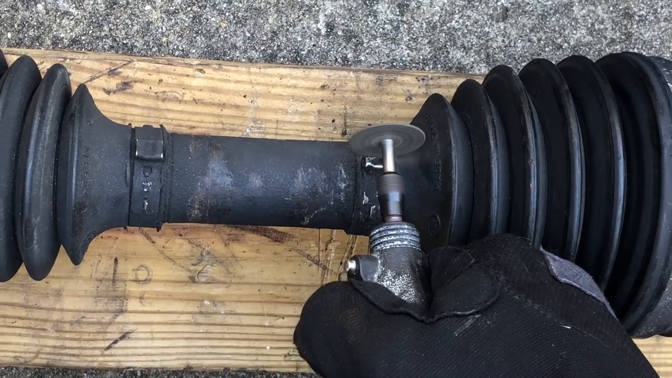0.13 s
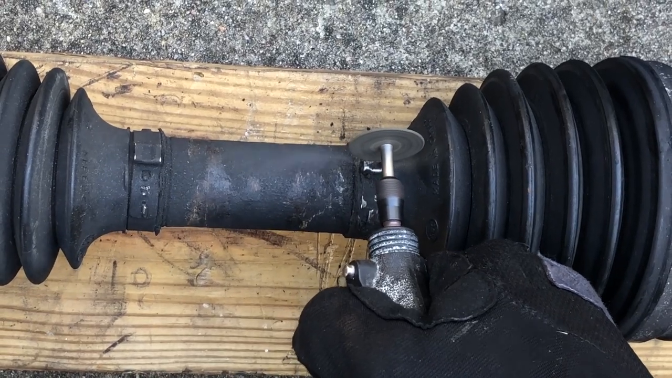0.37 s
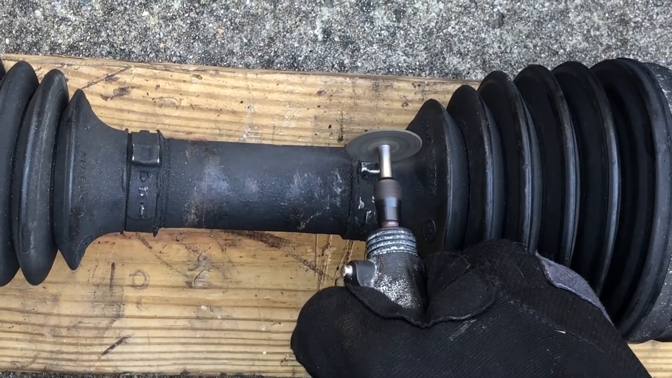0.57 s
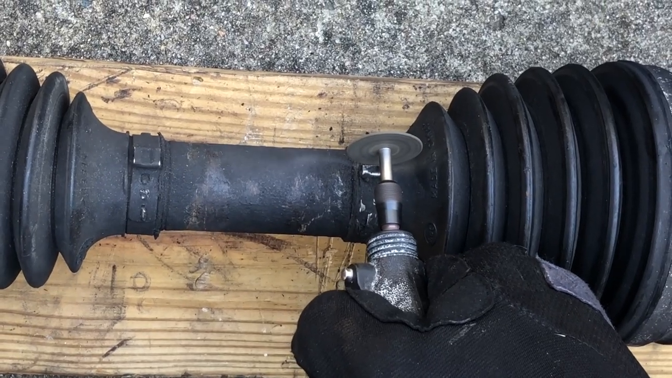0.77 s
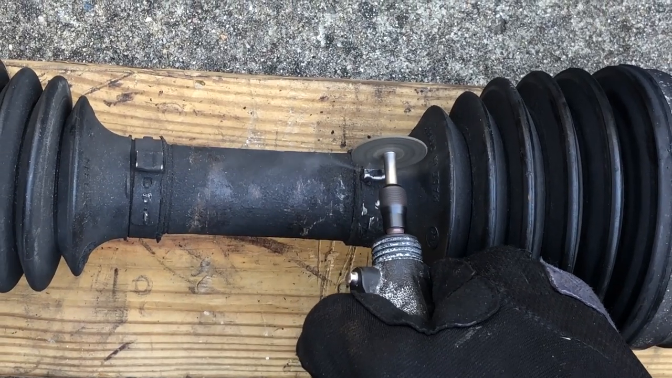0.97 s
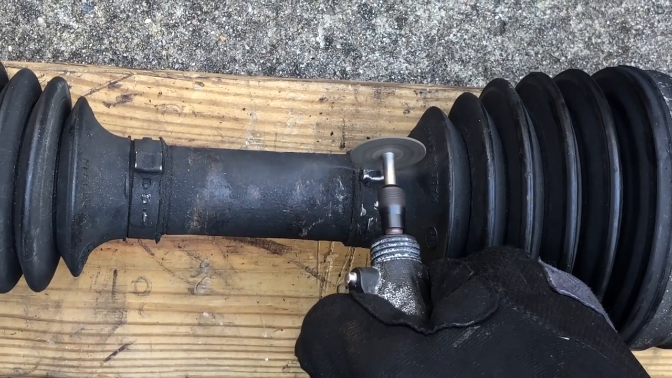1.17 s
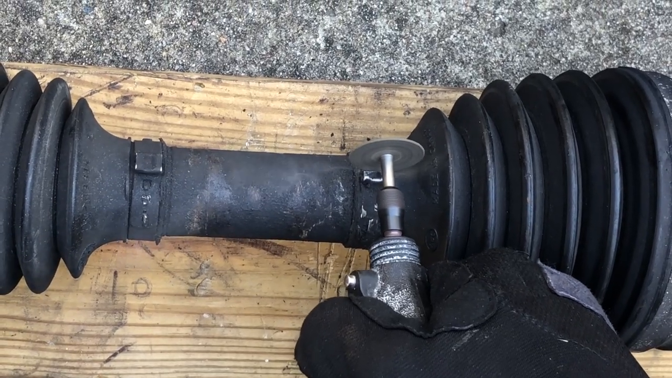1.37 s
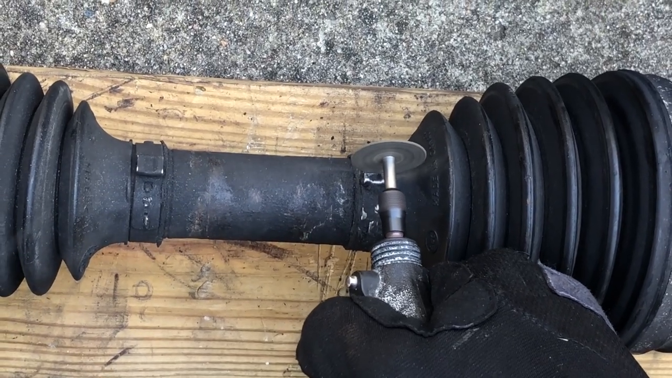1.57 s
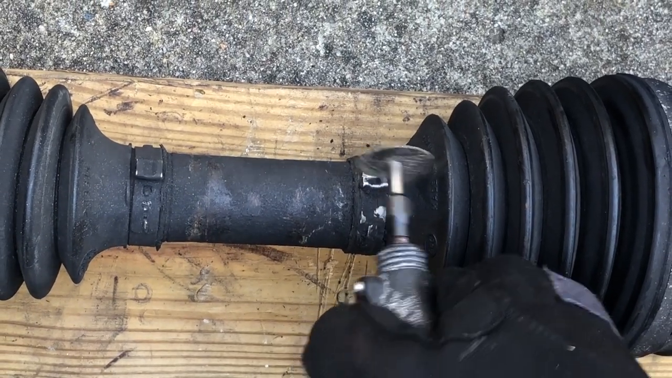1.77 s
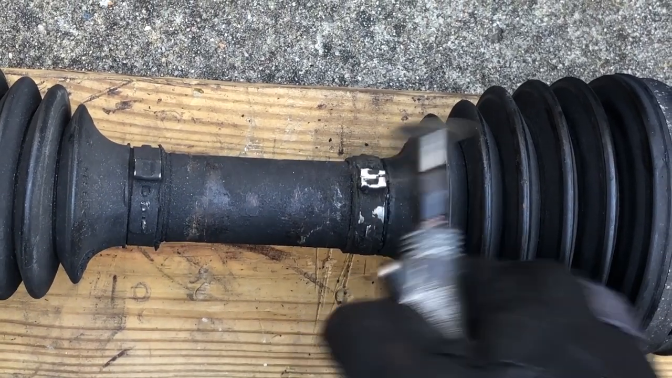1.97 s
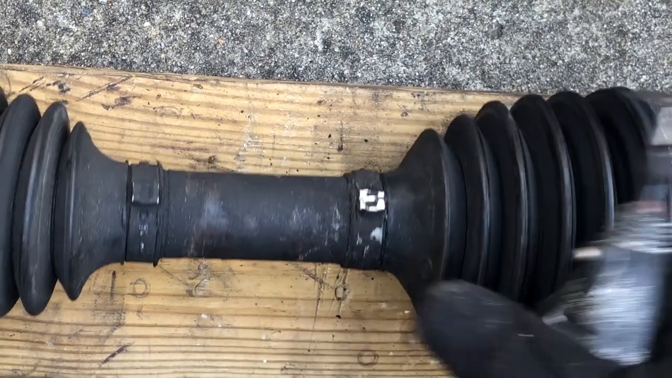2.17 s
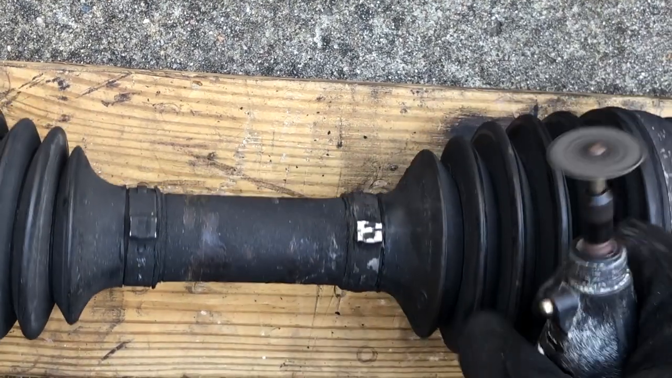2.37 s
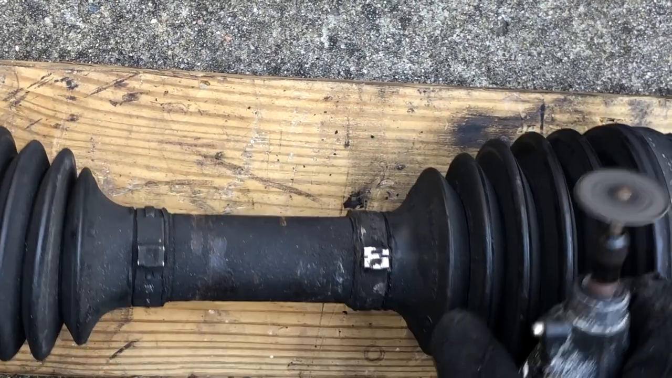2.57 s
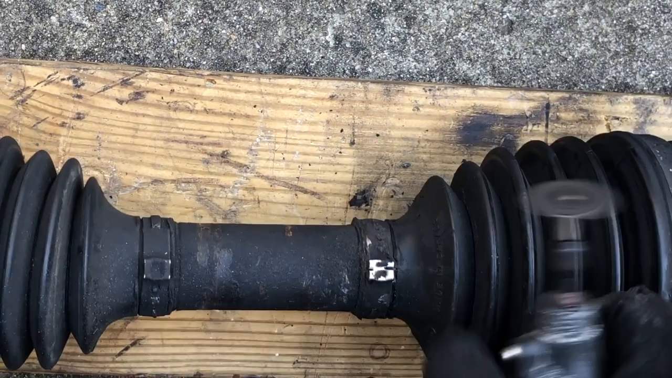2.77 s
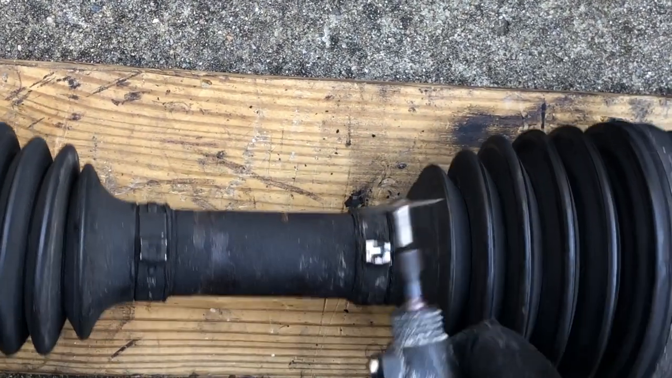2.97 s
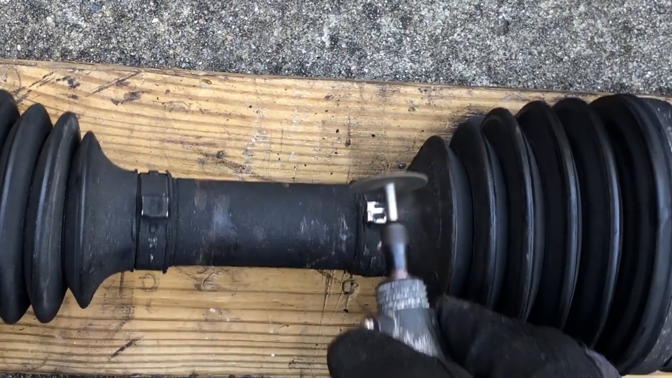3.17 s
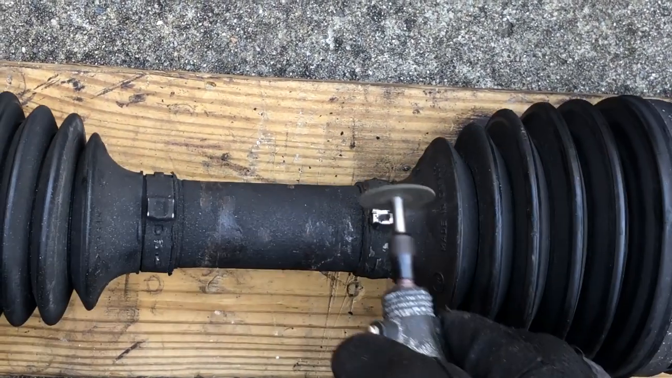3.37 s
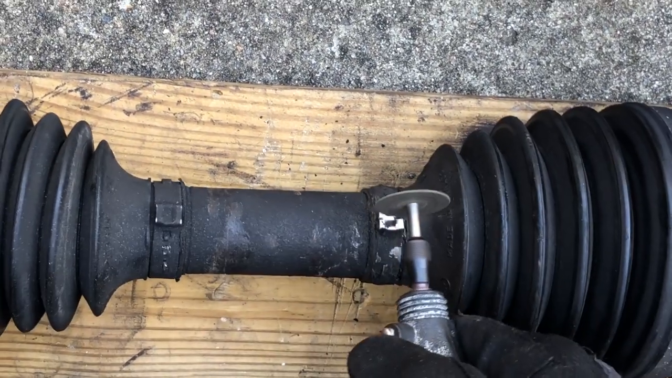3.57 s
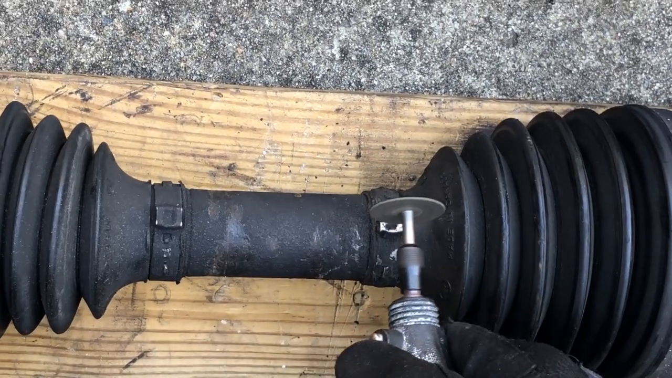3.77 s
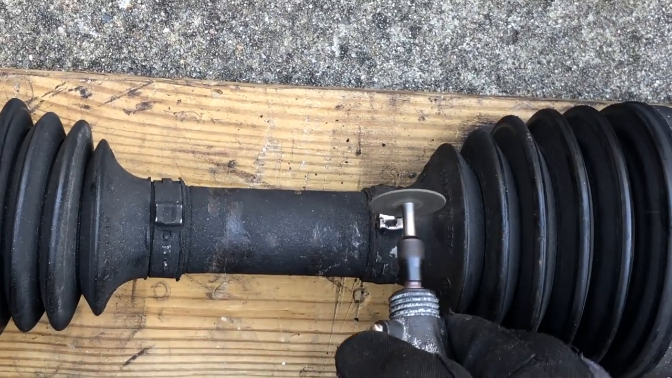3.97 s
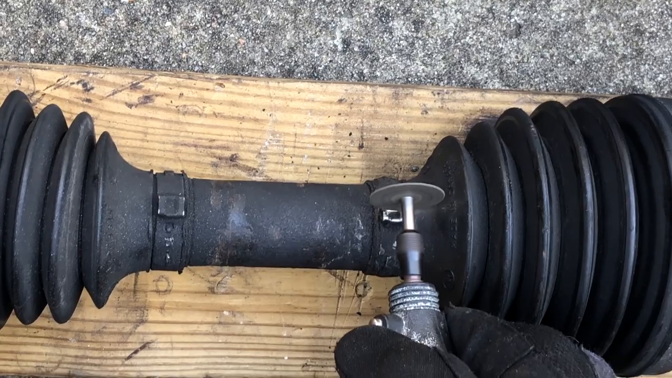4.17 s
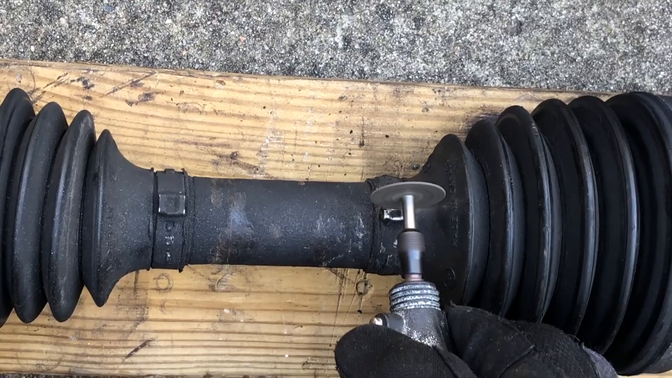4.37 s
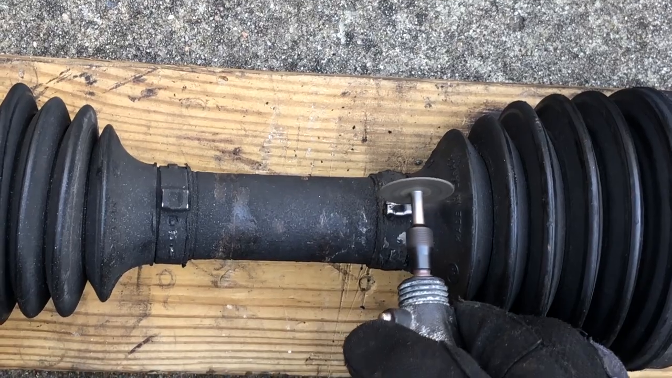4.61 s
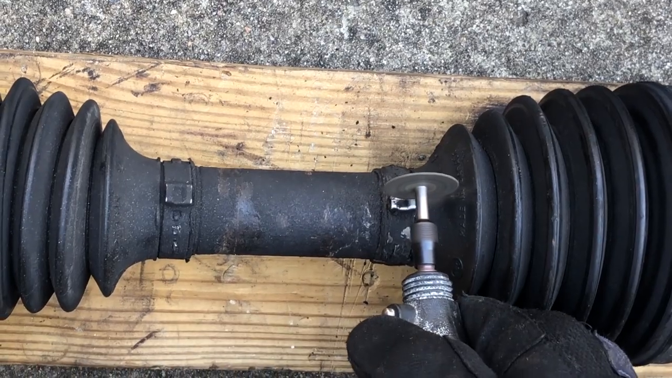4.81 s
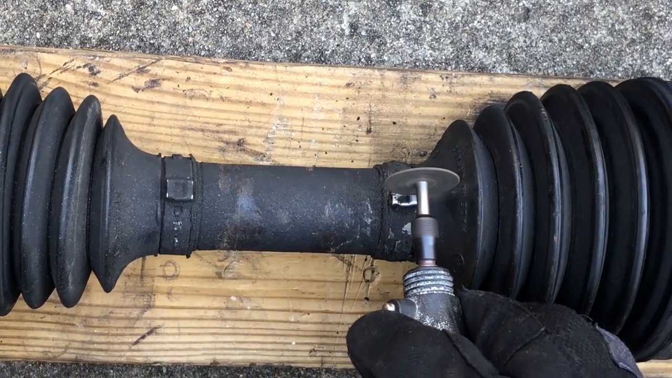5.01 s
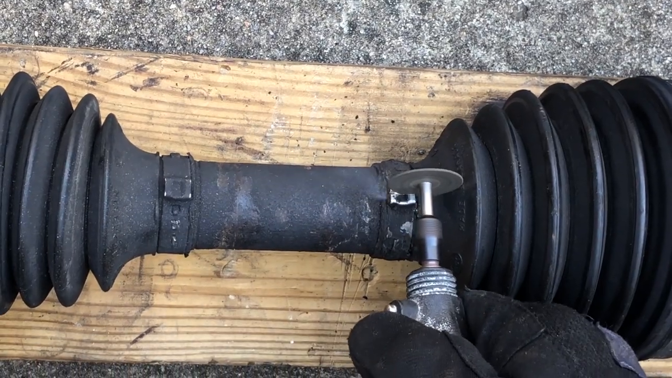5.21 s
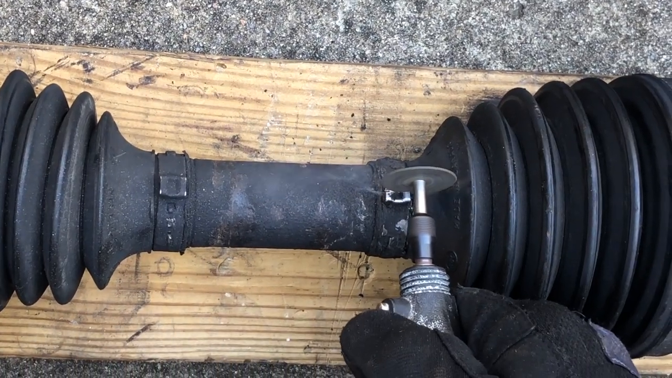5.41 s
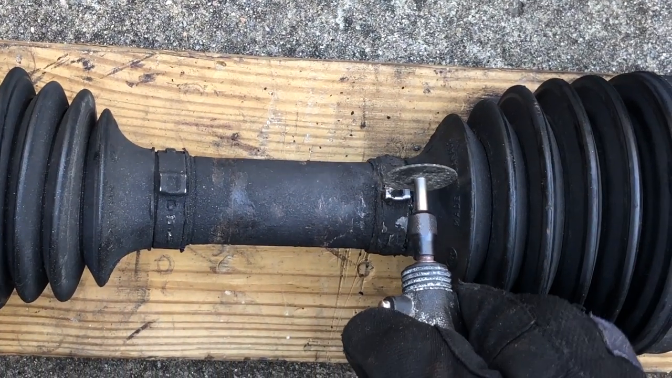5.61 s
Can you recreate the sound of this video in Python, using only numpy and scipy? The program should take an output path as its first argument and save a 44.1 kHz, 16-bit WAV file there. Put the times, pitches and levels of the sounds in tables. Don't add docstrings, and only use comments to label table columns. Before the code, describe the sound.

Gritty metal grinding sags to a growling stall, a small motor spins up with a buzzing whine, and raspy cutting resumes and slows.

```python
import sys
import numpy as np
from scipy import signal
from scipy.io import wavfile
from scipy.ndimage import uniform_filter1d

SR = 44100
rng = np.random.default_rng(int(sys.argv[2]) if len(sys.argv) > 2 else 0)


def linear_from_db(decibels):
    return 10 ** (np.asarray(decibels, float) / 20)


def unload_wav(signal):
    wavfile.write(
        sys.argv[1],
        SR,
        np.round(np.clip(np.atleast_2d(signal).T, -1, 1) * 32767).astype(np.int16),
    )


N = 249160
FULL_HZ = 362


def evened(x):
    return x / np.sqrt(np.mean(x ** 2) + 1e-20)


def smooth_noise(count, length):
    return evened(uniform_filter1d(rng.standard_normal(count), length))


def read(points, hz):
    f, value = np.transpose(points)
    return np.interp(np.log(hz + 1), np.log(f + 1), value)


def columns(rows, t):
    s, *rest = np.transpose(rows)
    return [np.interp(t, s, c) for c in rest]


def coloured(x, gain):
    log_gain = np.log(gain(abs(np.fft.fftfreq(8192, 1 / SR))) + 1e-5)
    spectrum = np.exp(np.conj(signal.hilbert(log_gain)))
    taps = np.fft.ifft(spectrum).real[:4096]
    return signal.oaconvolve(x, taps)[:len(x)]


def above(x, hz):
    sos = signal.butter(4, hz, "high", fs=SR, output="sos")
    return signal.sosfiltfilt(sos, x, padlen=0)


def patchy(x, patchy_db, flicker_db, frames=5, bins=5):
    z = signal.stft(x, nperseg=512, noverlap=384)[2]
    patches = rng.standard_normal(z.shape[::-1]).T
    patches = uniform_filter1d(patches, int(bins), 0)
    patches = evened(uniform_filter1d(patches, int(frames), 1))
    flicker = smooth_noise(z.shape[1], 5)
    z = z * linear_from_db(patchy_db * patches + flicker_db * flicker)
    return signal.istft(z, nperseg=512, noverlap=384)[1][:len(x)]


def resonate(x, hz, width):
    turn = np.exp(2j * np.pi * np.cumsum(hz) / SR)
    r = np.exp(-np.pi * width / SR)
    return 2 * (turn * signal.lfilter([1 - r], [1, -r], x / turn)).real


# t/s, speed/(turns per s)
BOGGING = [(0, 198), (.1, 188), (.368, 158), (.6, 144), (.81, 120.4), (1.08, 96.5), (1.3, 84), (1.78, 39),
           (1.8, 6.1)]
# t/s, speed/(turns per s)
BITING = [(4.26, 358), (4.386, 351.7), (4.514, 344.8), (4.678, 315.7), (5.034, 219.2), (5.132, 188.8),
          (5.272, 124.9), (5.4, 94.15), (5.65, 49.78)]
# t/s, speed/(turns per s), time constant/s
SPIN_UP = [(2.47, 70.6, .552), (2.11, 27, .11)]


def shaft(t):
    missing = sum(hz * np.exp((s - t) / tau) for s, hz, tau in SPIN_UP)
    free = np.maximum(FULL_HZ - missing, 5)
    rocking = np.cos(2 * np.pi * (t - .775) / .088) * np.exp(-((t - .82) / .36) ** 4)
    cutting = columns(BOGGING + BITING, t)[0] + 3.2 * rocking
    return np.where((t > BOGGING[-1][0]) & (t < BITING[0][0]), free, cutting)


# t/s, jolt level/dB, fade/s
CATCHES = [(.025, 5, .04), (.12, 0.5, .03), (.2763, 4, 0.039), (0.3585, 4, 0.049), (.598, 4, .035),
           (.772, 5, .04), (0.8494, 0.5, 0.04), (0.9553, 3, .026), (1.105, 0, 0.034), (1.2017, -2.5, .026),
           (1.5364, 2, .03), (1.7054, -1, 0.029), (1.738, 3, .03), (4.2476, 5, 0.03), (4.3137, 5, .03),
           (4.345, 2.5, 0.019), (4.401, 7, .02), (4.4471, 5, 0.024), (4.49, 5.5, .07), (4.594, 8, .03),
           (4.675, 1.5, 0.031), (4.7383, 3.5, 0.025), (4.7748, 2, 0.035), (4.8732, 6.5, 0.025),
           (5.1196, 4.5, 0.037), (5.206, 4.5, .035), (5.3493, 3, 0.025), (5.5557, 1, 0.028)]
# t/s, level/dB, half length/s
LIFTS = [(.09, -3.5, .025), (.206, -6.5, .025), (0.761, -1.5, .02), (0.9, -0.5, 0.018), (1.506, -7, .028),
         (1.598, 1, .02), (4.289, -2, 0.011), (4.47, -2, .012), (4.643, -5.5, 0.013), (5.176, -0.5, 0.021),
         (5.272, -2, .02), (5.526, -2, .025)]


def chatter(t, rise_s=.003):
    since = [(np.maximum(t - s + rise_s, 0), db, fade) for s, db, fade in CATCHES]
    jolts = sum(db * (1 - np.exp(-u / rise_s)) * np.exp(-u / fade) for u, db, fade in since)
    return jolts + sum(db * np.exp(-((t - s) / half) ** 2) for s, db, half in LIFTS)


def grit(t, hz, turns, memory, tearing, wobble):
    grains = 300
    turns = turns + .004 * smooth_noise(len(t), 900)
    count = int(turns[-1] - turns[0]) + 2
    angle = np.sort(rng.random(grains))
    keep = np.clip(memory, 0, .995)
    fresh_sizes = rng.standard_normal((count + 60, grains))
    size = signal.lfilter([np.sqrt(1 - keep ** 2)], [1, -keep], fresh_sizes, axis=0)[60:]
    strike_turns = np.floor(turns[0]) + np.arange(count)[:, None] + angle
    at = np.interp(strike_turns, turns, np.arange(len(t)), -99, -99).ravel()
    size, at = size.ravel()[at >= 0], at[at >= 0]
    strikes = np.zeros(len(t) + 16)
    for k in range(-7, 9):
        off = k - at % 1
        pulse = size * np.sinc(off) * np.cos(np.pi * off / 16) ** 2
        strikes += np.bincount(at.astype(int) + k + 7, pulse, len(strikes))
    steady = strikes[7:len(t) + 7] / np.sqrt(hz * grains / SR)
    fresh = rng.standard_normal(len(t))
    shares = [np.clip(share * 100 / hz, 0, 1) for share in tearing]
    low, high = (np.sqrt(1 - share) * steady + np.sqrt(share) * fresh for share in shares)
    scrape = low + above(high - low, 3500)
    return scrape * np.exp(wobble * np.cos(2 * np.pi * turns) + 0.037 * np.cos(4 * np.pi * turns + 1))


# f/Hz, width/Hz, level/dB
RINGS = [
    [(980, 1300, -21), (1641, 273, -3.5), (2303, 500, -7), (2790, 230, -10.5), (3300, 170, -12),
     (4160, 95, -13.5), (4700, 200, -14.5), (5250, 360, -5.5), (5687, 135, -1.5), (6210, 450, -8.5),
     (8230, 440, -3.5), (8990, 210, -1.5), (9950, 710, -3), (11410, 520, -12), (12340, 300, -13),
     (14300, 460, -9), (15340, 890, -3)],
    [(587, 160, -31), (1054, 170, -5.5), (1680, 440, -4.5), (2060, 240, -12), (2560, 330, -6.5),
     (3350, 570, -16), (6650, 260, -10), (7290, 510, -10), (8390, 210, -6.5), (9550, 190, -6.5),
     (10300, 960, -3), (11600, 650, -9), (13300, 780, -8), (13930, 370, 2.5), (14800, 660, 10.5),
     (15900, 700, 9)],
]
VALLEY_DB = [-16, -14.5]
# width/Hz, level/dB
CONTACT = [(500, 1), (900, 5)]
TEARING = [(.08, .8), (.15, .45)]
# f/Hz, level re bite/dB
SHAKE = [(300, -56), (400, -32.5), (640, -25), (700, -52)]
# t/s, bite level/dB
BITES = [
    [(0, -22.5), (.15, -24.5), (.4, -26.5), (.7, -29), (1.2, -31), (1.45, -31.5), (1.66, -35), (1.74, -33),
     (1.77, -32.5)],
    [(4.248, -27), (4.28, -32), (4.356, -28), (4.385, -33)],
    [(4.398, -33), (4.44, -27), (4.6, -24.5), (4.92, -23), (5.2, -24.5), (5.38, -28), (5.53, -31),
     (5.6, -32), (5.65, -38)],
]
# slot, shaft level/dB, clamp level/dB, rim level/dB, grip level/dB, contact f/Hz
TOUCHES = [
    (0, -18, -14, -0.5, -1, 5380),
    (1, -20, 3, 1, -12, 5630),
    (1, -16, -12, -1, 1.5, 5270),
]
# shaft level/dB, clamp level/dB, rim level/dB, grip level/dB, contact f/Hz
PER_SAG = (8.5, 4.5, -2.5, 2, 150)
FOLLOW = (.5, 0.57, 0.84, 1.2)
SKIM_DB = (-6, -7, 7.5, 5.5)


def cut(rows, touch, hz, turns):
    slot, end = int(touch[0]), rows[-1][0]
    rings, valley_db, contact, tearing = RINGS[slot], VALLEY_DB[slot], CONTACT[slot], TEARING[slot]
    first = max(round((rows[0][0] - .004) * SR), 0)
    on = slice(first, min(round((end + .04) * SR), N))
    t, hz, turns = np.arange(N)[on] / SR, hz[on], turns[on]
    sag, after = (200 - hz) / 100, np.maximum(t - end, 0)
    *levels, contact_hz = (a + b * sag for a, b in zip(touch[1:], PER_SAG))
    skim, jolt_db = np.exp((hz - FULL_HZ) / 18), chatter(t)
    shaft_db, clamp_db, rim_db, grip_db = (
        db + s * skim + (f - 1) * jolt_db for db, s, f in zip(levels, SKIM_DB, FOLLOW))
    shaft_db = shaft_db + 3 * np.exp(np.minimum(45 - hz, 0) / 25)
    contact_hz = contact_hz + 90 * smooth_noise(len(t), 1800)
    bite_db = columns(rows, t)[0] + jolt_db - 2200 * after

    wobble = .12 + .21 * np.minimum(hz / 180, 1)
    scrape = grit(t, hz, turns, memory=.94, tearing=tearing, wobble=wobble)
    scrape *= signal.windows.tukey(len(t), 300 / len(t))

    def modes(f):
        energy = sum(linear_from_db(2 * db) / (1 + (2 * (f - f0) / w) ** 4) for f0, w, db in rings)
        return np.sqrt(linear_from_db(2 * valley_db) + energy)

    moving = resonate(resonate(scrape, contact_hz, contact[0]), contact_hz, contact[0])
    rung = coloured(scrape, modes) + linear_from_db(contact[1] + grip_db - 9.0) * moving
    rung = above(patchy(rung, patchy_db=2.2, flicker_db=-0.03, frames=16, bins=6.7), 510.0)
    clamp, face, rim = (above(rung, f) for f in (1950, 3500, 11500))
    body = linear_from_db(shaft_db + 600 * after) * evened(rung - clamp)
    body += linear_from_db(clamp_db) * evened(clamp - face)
    body += linear_from_db(read(SHAKE, 2 * hz)) * np.sin(4 * np.pi * turns)
    out = np.zeros(N)
    out[on] = linear_from_db(bite_db - 1.0) * (body + evened(face - rim) + linear_from_db(rim_db) * evened(rim))
    return out


# t/s, level/dB
WHINE = [(1.81, -51), (2.09, -47.5), (2.2, -46), (2.4, -38.5), (2.58, -38), (2.83, -42.5), (3.07, -41),
         (3.17, -47.5), (4.2, -53)]
# f/Hz, level/dB
HOUSING = [(500, -25.5), (1000, -10), (1500, -7), (2000, 2), (2450, 11), (2750, -6.5), (3000, -11.5),
           (3400, -21), (3800, -10), (4300, -17.5), (6000, -20.5)]
# multiple of shaft f, level/dB, share that pulses
ORDER_DB = [(0.997, -70.5, 1), (1.972, -56.5, 0.54), (3.02, -65, 0), (15.65, -64, 1), (25.2, -60, 0.4),
            (35.6, -87.5, 0.1)]
# f/Hz, level/dB
WOBBLE = [(100, -62.5), (240, -68.5), (290, -64), (329, -58.5), (340, -54), (359, -51)]
# f/Hz, level/dB
FAN = [(3000, -84), (3900, -70), (4950, -67), (5250, -51), (6250, -48), (6300, -55), (6460, -58)]
# f/Hz, level per Hz/dB
HISS = [(150, -51), (450, -15), (1050, -2), (1600, -3), (2570, -4), (3300, -11), (4160, -15), (5200, -14.5),
        (7300, -21), (9000, -24), (10500, -31), (11000, -25.5), (11500, -30.5), (16000, -31.5)]
# f/Hz, level/dB
BUZZ = [(200, -54), (450, -10), (600, -1.5), (780, -18.5), (1050, 4), (1350, -6), (1650, 1.5), (2500, -6),
        (3200, -18), (5500, -11.5), (8000, -33)]


def motor(t, hz, turns):
    whine_db, = columns(WHINE, t)
    stalled = np.exp(-hz / 61) * np.where(t > 1.866, .4, 1)
    hiss_db, treble_db = -60 - 6.5 * stalled, -54.5 - 15 * stalled
    mains_turns = 119.83 * t - .05
    beat = np.cos(2 * np.pi * mains_turns)
    burst = evened(np.exp(3.3 * beat))
    rough = 1 + 0.034 * smooth_noise(N, 150)

    slot_turns = 8 * turns
    slots = np.sin(2 * np.pi * slot_turns) + 0.95 * np.sin(4 * np.pi * slot_turns)
    whine = coloured(burst * rough * slots, lambda f: linear_from_db(read(HOUSING, f)))
    whine /= np.sqrt(uniform_filter1d(whine ** 2, 4000) + 1e-9)

    running = (hz / 360) ** 3.
    orders = sum(linear_from_db(db) * (1 - p + p * burst) * np.sin(2 * np.pi * (k * turns + k * k / 7))
                 for k, db, p in ORDER_DB)
    hum = linear_from_db(read(WOBBLE, hz)) * np.sin(2 * np.pi * turns)

    blades = 18
    drift = np.cumsum(4.03 * smooth_noise(N, 400)) / SR
    flutter_db = 2.0 * smooth_noise(N, 2500)
    fan = linear_from_db(read(FAN, blades * hz) + flutter_db) * np.sin(2 * np.pi * (blades * turns + drift))

    sparks = np.clip(0.3 * (1.25 - hz / 360), 0, 2)
    hiss = coloured(np.exp(sparks * beat) * rng.standard_normal(N), lambda f: linear_from_db(read(HISS, f)))
    hiss = patchy(hiss, patchy_db=1.64, flicker_db=0.2, frames=9.3)
    treble = above(hiss, 6000)
    hiss = linear_from_db(hiss_db + 14.5) * evened(hiss - treble) + linear_from_db(treble_db + 6.0) * evened(treble)

    kicks = sum(np.cos(2 * np.pi * k * mains_turns) for k in range(1, 60))
    buzz = evened(coloured(kicks * rough ** 4.6, lambda f: linear_from_db(read(BUZZ, f))))
    since = np.maximum(t - 1.866, 0)
    live = (t < 1.79) + np.minimum(since / .004, 1) * linear_from_db(4 * np.exp(-since / .06))
    buzz *= linear_from_db(hiss_db + 2.5 + 9.9 * (1 - hz / 360)) * live
    whine *= linear_from_db(whine_db + 2.5) * live * np.clip((hz - 20) / 40, 0, 1)
    return whine + np.sqrt(2) * (running * rough * orders + hum + fan) + hiss + buzz


# f/Hz, level per Hz/dB
YARD = [(12, -15), (32, 5.5), (60, -3), (115, 2), (200, -6.5), (350, -9), (628, -7), (900, -9),
        (1640, -8.5), (2780, -36), (6290, -40), (16000, -44)]


def yard():
    air = coloured(rng.standard_normal(N), lambda f: linear_from_db(read(YARD, f)))
    return linear_from_db(-52) * evened(patchy(air, patchy_db=.6, flicker_db=.05, frames=60, bins=1))


# t/s, peak level/dB, f/Hz, t60/s
CLICKS = [
    (1.8542, -41, 5700, 0.045),
    (2.555, -42, 2524, 0.015),
    (3.1278, -45, 2630, 0.015),
    (4.2474, -22, 10300, 0.014),
]


def clicks():
    out, t = np.zeros(N), np.arange(2000) / SR
    for s, db, hz, t60 in CLICKS:
        ring = np.sin(2 * np.pi * hz * t) + 0.61 * np.diff(rng.standard_normal(len(t) + 1))
        out[round(s * SR):][:len(t)] += linear_from_db(db - 60 * t / t60) * ring
    return out


# f/Hz, width/Hz, level/dB
NOTCHES = [(1416, 69, -15), (11460, 176, -15), (13200, 220, 6.5)]


def scene():
    t = np.arange(N) / SR
    hz = shaft(t)
    turns = np.cumsum(hz) / SR
    cuts = sum(cut(rows, touch, hz, turns) for rows, touch in zip(BITES, TOUCHES))
    tool = motor(t, hz, turns) + cuts

    def plank(f):
        return linear_from_db(sum(db / (1 + (2 * (f - f0) / w) ** 2) for f0, w, db in NOTCHES))

    return np.tile(coloured(tool + clicks(), plank) + yard(), (2, 1))


def roll_off(x):
    return signal.sosfilt(signal.butter(12, 16970, fs=SR, output="sos"), x)


def record(dry):
    edge = signal.firwin(1023, 15800, window=("kaiser", 10), fs=SR)
    mix = signal.oaconvolve(dry, edge[None], "same")
    return roll_off(mix)


dry = scene()
out = record(dry)
unload_wav(out)
```